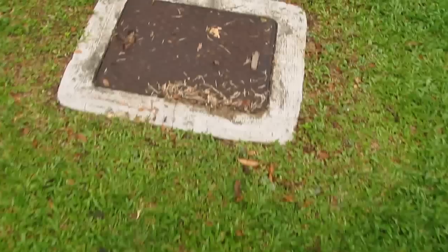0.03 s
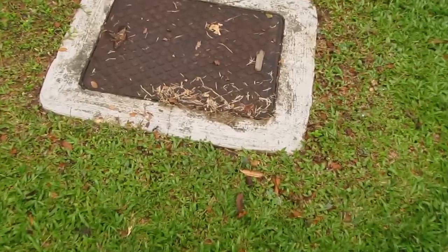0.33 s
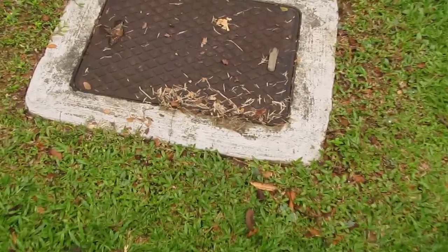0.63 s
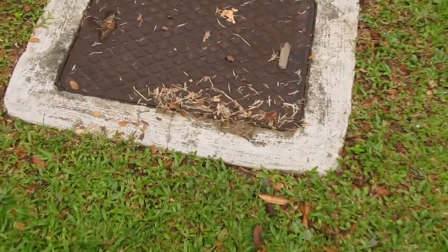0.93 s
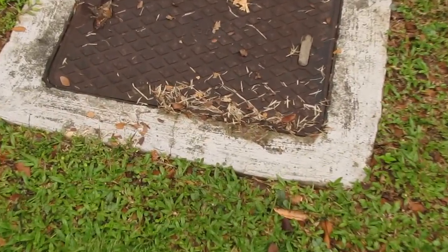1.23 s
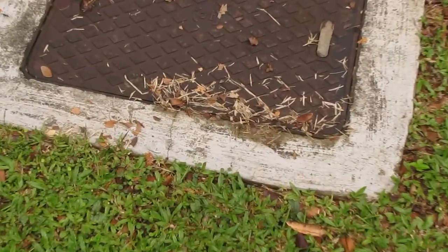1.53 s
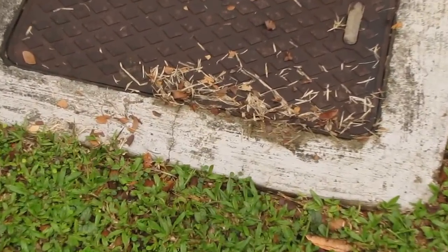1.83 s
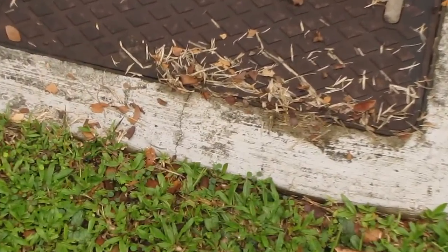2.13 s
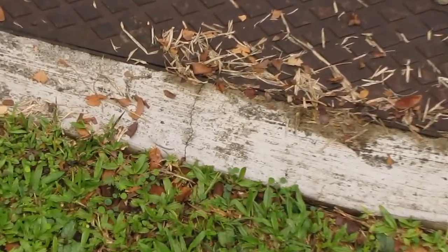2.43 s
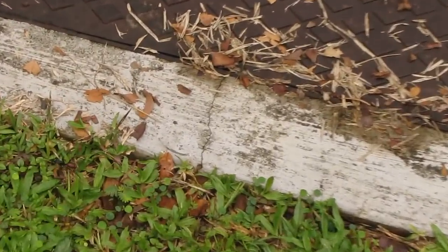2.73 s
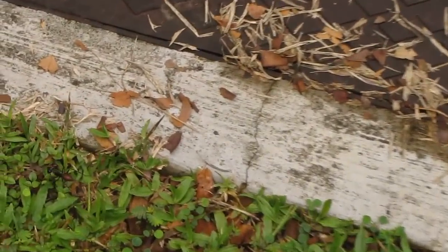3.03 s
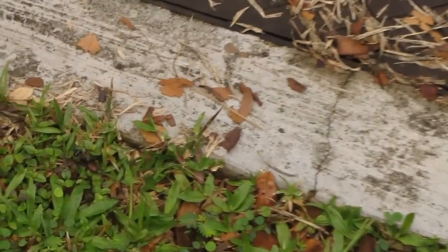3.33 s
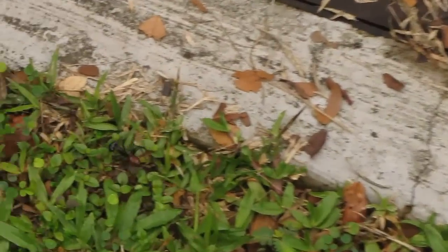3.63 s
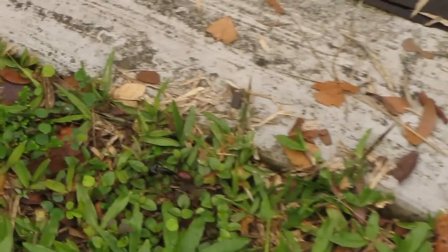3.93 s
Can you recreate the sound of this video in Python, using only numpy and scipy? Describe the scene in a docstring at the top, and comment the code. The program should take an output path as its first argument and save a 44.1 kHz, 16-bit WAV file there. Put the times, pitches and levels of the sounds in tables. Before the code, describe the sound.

Crickets and rasping insects keep up a dense, high chorus over a lawn. A small bird twitters faintly and distant traffic hums, while the hand-held microphone is bumped near the start and tapped near the end.

```python
"""A lawn full of insects

Near insects rasp and buzz in falling wing strokes at 7 and 11 kHz; far crickets merge into a band
just under 5 kHz. A small bird twitters in the trees, a far bird calls once, and distant traffic and
machinery hum. A few bumps and finger taps ring the shell and grip of a hand-held camera."""
import sys
import numpy as np
from scipy import signal
from scipy.fft import rfft, irfft, next_fast_len
from scipy.io import wavfile
from scipy.ndimage import map_coordinates

SR = 44100
rng = np.random.default_rng(int(sys.argv[2]) if len(sys.argv) > 2 else 0)


def materialize(psi):
    """Save the field psi as 16-bit PCM at rate SR to the path in sys.argv[1].

    A 1-D psi becomes a single channel; in a 2-D psi each row is a channel.
    """
    bounded = np.clip(np.atleast_2d(psi).T, -1, 1)
    quanta = np.round(bounded * 32767).astype(np.int16)
    wavfile.write(sys.argv[1], SR, quanta)


N = 176400
T = np.arange(N) / SR

# reverb of the garden (frequency [Hz], t60 [s])
GARDEN_DECAY = [(500, 0.9), (3500, 0.55), (12000, 0.34)]
# traffic rumble and foliage hiss (frequency [Hz], relative level [dB])
TRAFFIC_SPECTRUM = [(13, -53), (22, -29), (54, -1), (151, -2.5), (183, -3.5), (275, -7), (333, -7.5),
                    (453, -11.5), (519, -13.5), (1100, -18), (1330, -24), (2200, -34.5), (2860, -83),
                    (4840, -120)]
FOLIAGE_SPECTRUM = [(1200, -3), (2200, 1.5), (3800, 1), (5700, -1.5), (8500, -4), (11000, 0), (12500, -28)]
# partials of the machine hum (frequency [Hz], level [dB])
HUM_PARTIALS = [(91.3, -61), (182.3, -55), (274, -58), (457, -61.5)]

# camera bumps (time [s], ring gain [dB], thud gain [dB], click gain [dB], click L-R [dB], cutoff [Hz])
BUMP_HITS = [(.3316, -12, -18, -15, 6, 12000), (0.4531, -15, -22.5, -22.5, 2.5, 2750),
             (.536, -29.5, -29.5, -42, -2, 2000), (.834, -44, -24, -35, 2, 1510)]
# finger taps (time [s], ring gain [dB], click gain [dB], click cutoff [Hz])
FINGER_TAPS = [(1.648, -33, -32, 900), (1.826, -39, -50, 800), (1.905, -31.5, -45, 900),
               (3.6174, -13, -17.5, 2000), (3.6230, -25, -13.5, 6050)]
# resonances of the camera (frequency [Hz], relative level [dB], t60 [s], right-side lag [s])
SHELL_MODES = [(797, 0.73, 0.02, 0.00023), (1044, -2.7, 0.024, 0.00038)]
THUD_MODES = [(134, 4, 0.049, 0.002), (214, 0, 0.038, 0.002), (347, -1, 0.03, 0)]
GRIP_MODES = [(590, -2, .045, .00015), (430, -14, .025, 0), (265, -13, .035, 0), (730, -8, .04, .0002),
              (1010, -3, .055, .00033), (1170, -7, .055, .00027), (1560, -11, .04, .00018)]
# contact click ahead of its low-pass (frequency [Hz], relative level [dB])
CLICK_SPECTRUM = [(250, -6.5), (800, 5), (1600, -9), (3900, -0.5), (6000, -5), (9000, -13.5), (12000, -18),
                  (15500, -31)]

# far whistles (centre time [s], length [s], start [Hz], middle [Hz], end [Hz], relative level [dB])
FAR_WHISTLES = [(1.92, 0.073, 1125, 1178, 1200, -46.5), (2.02, .17, 1179, 1196, 1224, -43.5),
                (2.34, 0.032, 2330, 2280, 2260, -54), (3.672, 0.043, 1490, 1410, 1380, -49.5)]
# hoarse end of the far call (frequency [Hz], relative level [dB])
HOARSE_SPECTRUM = [(950, -56), (1250, 4), (1450, -4), (1680, 0), (1850, -44)]
# accents of the twittered phrases (time [s], relative level [dB])
PHRASE_ACCENTS = [(0.269, -37), (.647, -38), (1.024, -35.5), (1.416, -36), (3.569, -37.5), (3.947, -37.5)]
# one phrase (time from accent [s], length [s], start [Hz], middle [Hz], end [Hz], relative level [dB])
PHRASE_NOTES = [(-.123, .026, 4230, 3100, 2200, -5.5), (-.078, .022, 2200, 2604, 2850, -5),
                (-.037, .02, 2350, 2530, 2650, -5), (-.002, .02, 3250, 4050, 4250, 4.5),
                (0.015, 0.04, 4300, 3200, 2500, -4)]
# upslurred chips (centre time [s], middle pitch [Hz], relative level [dB])
RISING_CHIPS = [(.122, 4010, -35), (.315, 4880, -37), (.37, 3970, -39), (.432, 4070, -40), (.49, 4000, -40),
                (.547, 3950, -38.5), (.725, 4100, -41.5), (.815, 4850, -46), (.865, 3910, -41.5),
                (1.1, 3740, -41), (3.337, 3866, -41.5), (3.395, 3780, -39.5), (3.453, 3850, -38),
                (3.515, 3920, -38), (3.83, 3740, -40)]

# swell of the cricket chorus (time [s], level [dB])
CRICKET_SWELL = [(.1, -42.5), (.7, -40), (1.1, -39.5), (1.5, -37.5), (1.85, -37), (2.25, -36.5), (2.5, -40),
                 (2.85, -43), (3.3, -39), (4, -37)]
# solo crickets (pitch [Hz], chirp rate [1/s], level against chorus [dB], drift [fraction], L-R [dB])
CRICKET_TRILLS = [(4847, 21.6, -6.5, 0.00183, 31), (4660, 9.7, -13, 0.00497, 18),
                  (4936, 27, -17.5, 0.00389, 20)]
# insect choruses, one for each kind (frequency [Hz], relative level [dB])
CRICKET_SPECTRUM = [(3900, -28), (4300, -13.5), (4520, 1.5), (4720, -1), (4880, 0), (5000, -5), (5120, -15),
                    (5500, -27.5), (6000, -30)]
LOW_CRICKET_SPECTRUM = [(2750, -36), (2950, 7), (3080, 10), (3300, -5)]
BUZZ_SPECTRUM = [(8000, -16), (9300, -16), (10200, -0.5), (10900, -5.5), (11450, -1.5), (11900, -46),
                 (12400, -21), (13100, -9), (14400, -10), (15000, -18), (15600, -54)]
RASP_SPECTRUM = [(5600, -51), (6150, -13), (6450, -0.5), (6800, -1.5), (7250, 0), (7550, -9), (8000, -30.5),
                 (8600, -77)]
# solo buzzers (stroke rate [1/s], start [Hz], end [Hz], duty [fraction], level [dB], L-R [dB])
BUZZ_VOICES = [(109.2, 11650, 10150, 0.666, -52, -4.5), (142, 11400, 9900, .7, -53, 19)]
# near rasper's wing strokes (time in cycle [s], length [s], start [Hz], end [Hz], relative level [dB])
RASP_STROKES = [(.0185, .012, 6900, 6750, -1.5), (.0315, .0095, 7400, 6400, 0),
                (.0455, .0085, 7450, 6350, 0), (.0595, .009, 7200, 6800, -7)]


def amp(db):
    """Decibels to gain."""
    return 10 ** (np.asarray(db) / 20)


def unit(x):
    """Scale to rms 1."""
    return x / np.sqrt(np.mean(x ** 2) + 1e-20)


def along(points, hz):
    """Read a curve of (frequency, value) points on a log frequency axis."""
    freqs, values = np.transpose(points)
    return np.interp(np.log(hz + 1), np.log(freqs + 1), values)


def wobble(rate):
    """Smooth random modulation with rate knots a second."""
    return map_coordinates(rng.standard_normal(int(N * rate / SR) + 4), [T * rate], mode="nearest")


def filtered(x, response):
    """Equalise x with a gain given as a function of frequency."""
    size = next_fast_len(N + SR // 2)
    return irfft(rfft(x, size) * response(np.fft.rfftfreq(size, 1 / SR)), size)[..., :N]


def pan(db):
    """Constant-power gains with the left side db above the right."""
    return unit(amp(np.array([[db], [-db]]) / 2))


def noise_bed(spectrum, correlation):
    """Shaped stereo noise of rms 1 with a set left-right correlation."""
    low, high = spectrum[0][0], spectrum[-1][0]
    white = rng.standard_normal((2, N))
    mid, side = filtered(white, lambda hz: amp(along(spectrum, hz)) * (hz < high) * (hz > low))
    width = np.arccos(correlation) / 2
    return unit(np.cos(width) * mid + np.sin(width) * np.array([side, -side]))


def outdoors(x, wet_db):
    """Spread a mono source into stereo with echoes scattered by trees and walls."""
    hz, t, noise = signal.stft(rng.standard_normal((2, SR // 2)), SR, nperseg=256)
    decay = 1000. ** (-t / along(GARDEN_DECAY, hz)[:, None])
    tail = signal.istft(noise * decay, SR, nperseg=256)[1]
    echo = signal.fftconvolve(x[None], tail / np.linalg.norm(tail[0]), axes=1)[:, :N]
    return (x + amp(wet_db) * echo) / np.hypot(1, amp(wet_db))


def add(track, time, sound):
    """Mix a short sound in, starting at time seconds."""
    first = max(round(time * SR), 0)
    part = track[..., first:first + sound.shape[-1]]
    part += sound[..., :part.shape[-1]]


def glide(length, start, middle, end, overtone=0):
    """A tone that swells and fades while bending through three pitches."""
    progress = np.linspace(0, 1, max(int(length * SR), 8))
    hz = np.polyval(np.polyfit([0, .5, 1], [start, middle, end], 2), progress)
    phase = 2 * np.pi * np.cumsum(hz) / SR
    return np.sin(np.pi * progress) * (np.sin(phase) + overtone * np.sin(2 * phase))


def background():
    """The bed: distant traffic, a machine's gently wavering hum and a thin hiss of foliage."""
    traffic = amp(-44.5 + 0.62 * wobble(7.15)) * noise_bed(TRAFFIC_SPECTRUM, 0.85) * pan(0.5)
    hum = np.zeros(N)
    for hz, db in HUM_PARTIALS:
        peak = amp(db + 1.3 * wobble(3.49)) * np.sqrt(2)
        hum += peak * np.sin(2 * np.pi * hz * T + 1.2 * wobble(4.01))
    return traffic + hum + amp(-52.5) * noise_bed(FOLIAGE_SPECTRUM, 0.12)


def ring(modes, attack_s):
    """Damped modes of alternating sign; each reaches the right microphone port with its own lag."""
    t = np.arange(SR // 8) / SR
    out = np.zeros((2, len(t)))
    for k, (hz, db, t60, lag) in enumerate(modes):
        age = np.maximum(t - np.array([[0], [lag]]), 0)
        envelope = amp(db - 60 * age / t60) * (1 - np.exp(-age / attack_s))
        out += (-1) ** k * envelope * np.sin(2 * np.pi * hz * age)
    return out


def click(db, pan_db, cutoff_hz, snap_t60_s=0.015, tail_t60_s=0.04):
    """A dry contact click; a low cutoff dulls it to a soft touch."""
    t = np.arange(SR // 20) / SR
    fade = 1000. ** (-t / snap_t60_s) + amp(-24) * 1000. ** (-t / tail_t60_s)
    dulled = [(hz, level - 10 * np.log10(1 + (hz / cutoff_hz) ** 4)) for hz, level in CLICK_SPECTRUM]
    return amp(db) * pan(pan_db) * fade * noise_bed(dulled, 0.2)[:, :len(t)]


def handling():
    """Bumps ring the camera's shell and thud, fingers ring its grip; every contact clicks."""
    out = np.zeros((2, N))
    for time, ring_db, thud_db, click_db, pan_db, cutoff_hz in BUMP_HITS:
        add(out, time, amp(ring_db) * ring(SHELL_MODES, attack_s=0.00082))
        add(out, time, amp(thud_db) * pan(13.3) * ring(THUD_MODES, attack_s=0.0011))
        add(out, time, click(click_db, pan_db, cutoff_hz))
    for time, ring_db, click_db, cutoff_hz in FINGER_TAPS:
        add(out, time, amp(ring_db) * ring(GRIP_MODES, attack_s=0.00056))
        add(out, time, click(click_db, pan_db=8, cutoff_hz=cutoff_hz))
    return out


def far_bird(hoarse_at_s=2.06, hoarse_half_width_s=0.052):
    """A long whistle that turns hoarse, and a few faint peeps."""
    calls = np.zeros(N)
    for time, length, start, middle, end, db in FAR_WHISTLES:
        add(calls, time - length / 2, amp(db) * glide(length, start, middle, end))
    swell = amp(-45) / (1 + ((T - hoarse_at_s) / hoarse_half_width_s) ** 2)
    hoarse = swell * noise_bed(HOARSE_SPECTRUM, 0.23)
    return amp(1) * outdoors(calls, wet_db=-2) + hoarse


def small_bird(pitch_scatter=0.0188, chip_s=0.023, chip_rise=0.286, leaf_t60_s=0.034):
    """Quick phrases, no two quite alike, and upslurred chips, blurred by leaves and trees."""
    song = np.zeros(N)
    for accent, phrase_db in PHRASE_ACCENTS:
        for offset, length, start, middle, end, db in PHRASE_NOTES:
            pitches = np.array([start, middle, end]) * (1 + pitch_scatter * rng.standard_normal(3))
            add(song, accent + offset - length / 2, amp(phrase_db + db) * glide(length, *pitches))
    for time, hz, db in RISING_CHIPS:
        chip = glide(chip_s, hz * (1 - chip_rise), hz, hz * (1 + chip_rise / 2))
        add(song, time - chip_s / 2, amp(db) * chip)
    # early reflections in the bird's own tree outweigh the direct song
    t = np.arange(SR // 10) / SR
    leaves = rng.standard_normal(len(t)) * 1000. ** (-t / leaf_t60_s)
    song += amp(11) * signal.fftconvolve(song, leaves / np.linalg.norm(leaves))[:N]
    return amp(-45.5) * pan(1.6) * unit(outdoors(song, wet_db=5))


def crickets():
    """A far chorus merged into one band, with a few solo trills and a fainter, lower kind."""
    chorus = noise_bed(CRICKET_SPECTRUM, 0.27) * pan(4.7) * amp(0.6 * wobble(24.9))
    for hz, rate, db, drift, pan_db in CRICKET_TRILLS:
        tone = np.sin(2 * np.pi * np.cumsum(hz * (1 + drift * wobble(30))) / SR)
        chirps = 1 + 0.59 * np.sin(2 * np.pi * rate * T + .5 * wobble(4.5))
        chorus += amp(db) * pan(pan_db) * unit(outdoors(unit(tone * chirps), wet_db=-6.5))
    swell = amp(np.interp(T, *np.transpose(CRICKET_SWELL)))
    return chorus * swell + amp(-61.5) * noise_bed(LOW_CRICKET_SPECTRUM, 0.2)


def buzzers():
    """Small insects in the grass: each stroke starts afresh and falls; others merge into a sizzle."""
    out = amp(-50) * pan(2.45) * noise_bed(BUZZ_SPECTRUM, -0.33)
    for rate, start, end, duty, db, pan_db in BUZZ_VOICES:
        wing_cycles = rate * T + .06 * wobble(3.6) + 0.0035 * wobble(30)
        progress = np.minimum(wing_cycles % 1 / duty, 1)  # holds at 1, silent, between strokes
        tone_cycles = (start * progress + (end - start) * progress ** 2 / 2) * duty / rate
        strokes = np.sin(np.pi * progress) * np.sin(2 * np.pi * tone_cycles + 0.57 * wobble(300))
        out += amp(db) * pan(pan_db) * outdoors(unit(strokes), wet_db=-5)
    return out


def raspers(cycle_s=1 / 17.02, pitch_scatter=0.0026, level_scatter_db=0.57):
    """One near insect repeats a group of falling wing strokes, almost alike, over a chorus of its kind."""
    strokes = np.zeros(N)
    for cycle_start in np.arange(0, T[-1], cycle_s):
        for offset, length, start, end, db in RASP_STROKES:
            force, tuning = rng.standard_normal(2)
            pitches = np.array([start, (start + end) / 2, end]) * (1 + pitch_scatter * tuning)
            stroke = amp(db + level_scatter_db * force) * glide(length, *pitches, overtone=amp(-23.5))
            add(strokes, cycle_start + offset - length / 2, stroke)
    soloist = amp(-41.5) * pan(-4.5) * unit(outdoors(unit(strokes), wet_db=-4))
    return soloist + amp(-43) * noise_bed(RASP_SPECTRUM, 0.036)


def scene(approach_db=-4.5, approach_s=1.06):
    """The full mix; the insects in the grass start softer and rise as the camera comes down to them."""
    approach = amp(approach_db * np.maximum(1 - T / approach_s, 0))
    insects = crickets() + approach * (raspers() + buzzers())
    return insects + small_bird() + far_bird() + background() + handling()


def record(dry, start_s=0.086, cutoff_hz=15700):
    """The mix cuts in after a moment of silence and passes a brick-wall low-pass."""
    return filtered(dry * (T > start_s), lambda hz: hz < cutoff_hz)


dry = scene()
out = record(dry)
materialize(out)
```